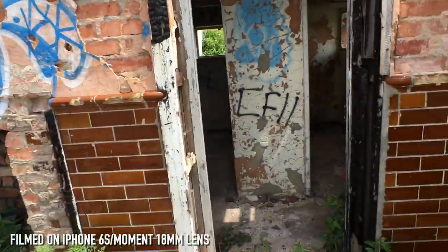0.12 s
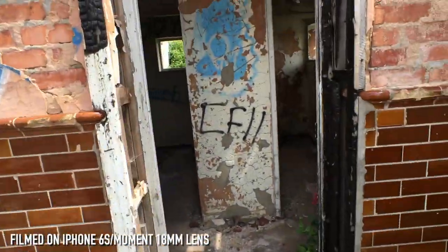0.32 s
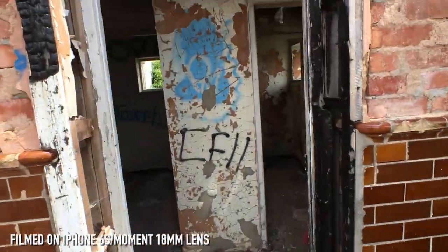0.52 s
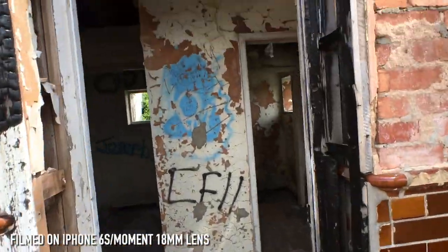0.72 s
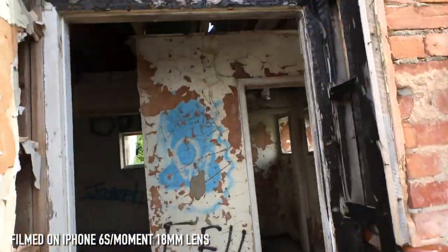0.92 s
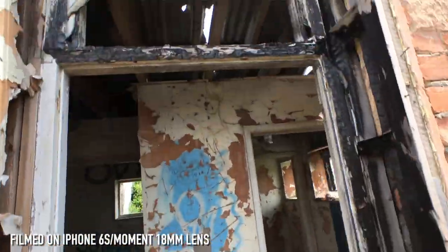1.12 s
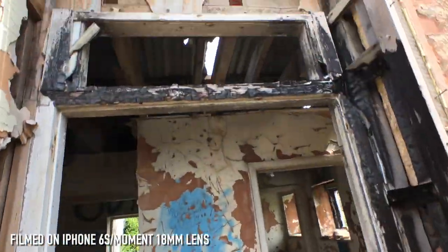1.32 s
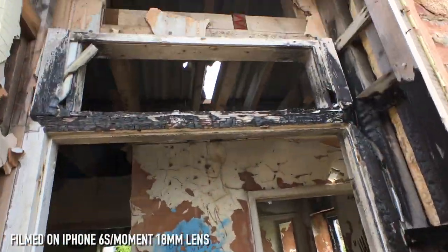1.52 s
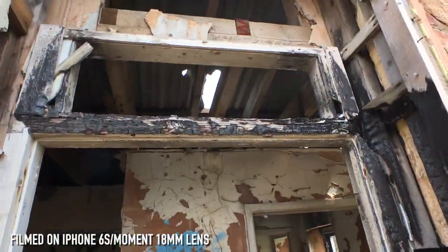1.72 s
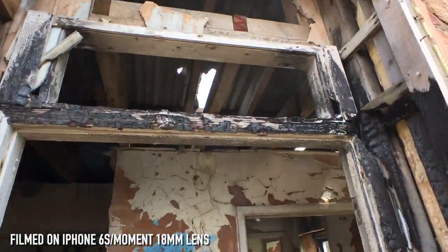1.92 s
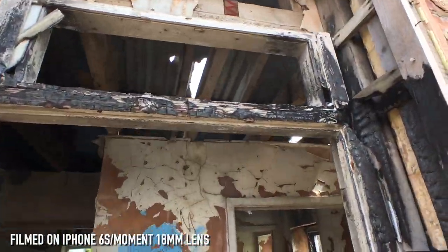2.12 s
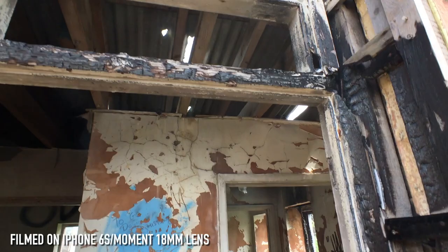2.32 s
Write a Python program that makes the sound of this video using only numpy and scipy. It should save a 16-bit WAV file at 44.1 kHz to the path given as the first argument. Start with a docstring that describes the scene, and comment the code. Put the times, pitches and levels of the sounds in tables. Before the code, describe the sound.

Slow footsteps on rubble and broken glass, a slab clacking, grit crunching, a pane clinking

```python
"""Slow steps over rubble and broken glass in the doorway of a derelict building.
A loose slab clacks under the first step, grit crunches under the second, a pane clinks, a shard scrapes:
noise-burst contacts with chip sprays plus modal ringing; the pane is one click with modes.
Splinters are short cracks with one mode each; shifting grit is a stream of pitched grains.
Near walls answer briefly; gliding sines call faintly as birds in the air, hiss and rumble of shaped noise."""
import sys
import numpy as np
from scipy import signal
from scipy.fft import rfft, irfft
from scipy.io import wavfile
from scipy.ndimage import uniform_filter1d

SR = 44100
rng = np.random.default_rng(int(sys.argv[2]) if len(sys.argv) > 2 else 0)


def waveform_to_disk(signal):
    """Save audio, clipped to [-1, 1], as 16-bit WAV at the path in sys.argv[1]."""
    frames = np.transpose(np.atleast_2d(signal))
    scaled = np.clip(frames, -1, 1) * 32767
    samples = np.round(scaled).astype(np.int16)
    wavfile.write(sys.argv[1], SR, samples)


N = 110250
SIZE = 16384  # samples in one impulse response
HZ, T = np.fft.rfftfreq(SIZE, 1 / SR), np.arange(SIZE) / SR
THUD_HZ, CLACK_HZ, MIDDLE_HZ, TREBLE_HZ = 363, 1080, 2450, 9500


def amp(db):
    """Decibels to gain."""
    return 10 ** (np.asarray(db) / 20)


def unit(x):
    """Scales to energy one."""
    return x / np.sqrt(np.sum(x ** 2) + 1e-20)


def fall(t_s, t60_s):
    """Exponential decay by 60 dB in t60_s."""
    return np.exp(-np.log(1000) * t_s / t60_s)


def read(points, hz):
    """Interpolates (frequency, dB) points on a log-frequency axis."""
    f, value = np.transpose(points)
    return np.interp(np.log(hz + 1), np.log(f), value)


def add(mix, s, sound):
    """Adds a sound at its time, cut at the end of the mix."""
    part = mix[max(round(s * SR), 0):][:len(sound)]
    part += sound[:len(part)]


def causal(db):
    """Minimum-phase impulse response with this gain curve: a sharp front."""
    log_gain = irfft(db * np.log(10) / 20)
    log_gain[1:SIZE // 2] *= 2
    log_gain[SIZE // 2 + 1:] = 0
    return irfft(np.exp(rfft(log_gain)))


def through(x, response):
    """Convolves and keeps the length."""
    return signal.fftconvolve(x, response)[:len(x)]


def noise(colour):
    """Steady Gaussian noise of rms one with the given spectrum."""
    spectrum = rfft(rng.standard_normal(N))
    gain = amp(read(colour, np.fft.rfftfreq(N, 1 / SR)))
    return unit(irfft(spectrum * gain, N)) * np.sqrt(N)


def room(x, room_db):
    """Adds echoes from floor and door frame, dense early scatter and a short tail."""
    # near walls and floor: (delay [s], gain)
    echoes = [(.0055, 0.21), (.0092, 0.66)]
    # colour of the reflections: (frequency [Hz], level [dB])
    room_colour = [(100, 0), (1000, -2.5), (5000, -0.5), (9500, -3), (16000, -2)]
    early_t60_s, late_t60_s, late_db, rise_s = 0.034, 0.14, -3.5, 0.0061
    decay = fall(T, early_t60_s) + amp(late_db) * fall(T, late_t60_s)
    scatter = unit(rng.standard_normal(SIZE) * decay * np.minimum(T / rise_s, 1))
    for delay_s, gain in echoes:
        add(scatter, delay_s * rng.uniform(.92, 1.08), np.array([gain]))
    reflected = through(x, unit(scatter))
    return x + amp(room_db) * through(reflected, causal(read(room_colour, HZ)))


def ringing(modes):
    """Dying sinusoids with soft onsets, summed to energy one."""
    out = 0
    for hz, db, t60_s in modes:
        onset = 1 - np.exp(-T * hz * 2)
        out = out + amp(db) * unit(np.cos(2 * np.pi * hz * T) * fall(T, t60_s) * onset)
    return unit(out)


def body(colour, modes, ring_db):
    """An object's answer to one click: a dry crack and its ringing modes."""
    return unit(unit(causal(read(colour, HZ))) + amp(ring_db) * ringing(modes))


def tone(thud_db, clack_db, treble_db):
    """Gain curve of one contact [dB], 0 dB in the middle."""
    points = [(THUD_HZ, thud_db), (CLACK_HZ, clack_db), (MIDDLE_HZ, 0), (TREBLE_HZ, treble_db)]
    return read(points, HZ)


def contact(decay_s, *tone_db):
    """A quickly dying cluster of tiny fractures, evened out and then given its tone."""
    rise_s, spread_db, floor_power = .0005, 3.5, 0.044
    fractures = rng.standard_normal(SIZE) * amp(spread_db * rng.standard_normal(SIZE))
    force = unit(fractures * np.exp(-T / decay_s) * (1 - np.exp(-T / rise_s)))
    power = uniform_filter1d(abs(rfft(force)) ** 2, size=90)
    own_db = 10 * np.log10(power + floor_power)
    return through(force, causal(tone(*tone_db) - own_db))


def chips(count, cycles, spread_s):
    """A spray of tiny fragments, each ringing briefly at its own pitch."""
    low_hz, high_hz = 1506, 13000
    out, t = np.zeros(SIZE), T[:1024]
    for pitch, delay, size in rng.random((count, 3)):
        hz = low_hz * (high_hz / low_hz) ** pitch
        ring = unit(np.sin(2 * np.pi * hz * t) * np.exp(-t * hz / cycles))
        add(out, -np.log(1 - delay) * spread_s, (0.067 + size) * np.sqrt(hz) * ring)
    return unit(out)


def crumble(decay_s, *tone_db):
    """A contact that also throws off chips."""
    chip_db = -2
    crack = contact(decay_s, *tone_db)
    crack_gain = np.sqrt(np.sum(crack ** 2) / 2)
    return crack + amp(chip_db) * crack_gain * chips(count=9, cycles=6, spread_s=.004)


def struck(hits, colour, modes, ring_db, room_db):
    """Each blow crumbles at the contact point and sets the whole object ringing."""
    out = np.zeros(N)
    crack = unit(causal(read(colour, HZ)))
    ring = amp(ring_db) * ringing(modes)
    for s, db, decay_s, *tone_db in hits:
        blow = causal(tone(*tone_db))
        sound = through(crumble(decay_s, *tone_db), crack) + through(blow, ring)
        add(out, s, amp(db) / np.hypot(1, amp(ring_db)) * room(sound, room_db))
    return out


def air():
    """Shaped noise: outdoor background, a hiss that comes and goes, a low rumble with one swell."""
    # background, hiss and rumble spectra: (frequency [Hz], level [dB])
    air_colour = [(15, -32.5), (28, -18.5), (46, -4), (87, -11), (200, -15), (350, -14), (440, -26.5),
                  (700, -23), (1370, -30.5), (2000, -26), (2700, -40), (4030, -35.5), (16000, -65.5)]
    hiss_colour = [(100, -11), (400, 0.5), (1200, 2.5), (2500, -3.5), (6200, -4.5), (7500, -15),
                   (10000, -11.5), (16000, -20.5)]
    rumble_colour = [(20, -24.5), (36, -6.5), (46, 0.5), (65, -8.5), (130, -20.5), (400, -50.5),
                     (2000, -79)]
    # hiss and rumble courses: (time [s], level [dB])
    hiss_level = [(0, -66), (.22, -68.5), (.55, -63), (.85, -67), (1.3, -63.5), (1.55, -72.5),
                  (1.95, -73.5), (2.2, -68.5), (2.5, -61)]
    rumble_level = [(0, -78), (1.74, -73), (1.78, -51), (1.83, -62), (1.93, -65), (2.02, -68), (2.5, -69)]
    air_db = -65.5
    t = np.arange(N) / SR
    hiss = noise(hiss_colour) * amp(np.interp(t, *np.transpose(hiss_level)))
    rumble = noise(rumble_colour) * amp(np.interp(t, *np.transpose(rumble_level)))
    return amp(air_db) * noise(air_colour) + hiss + rumble


def birds():
    """Thin falling whistles: wavering sine glides, blurred by reflections."""
    # distant calls: (start [s], length [s], first pitch [Hz], last pitch [Hz], level [dB])
    calls = [(0.627, 0.076, 1685, 1620, -67.5), (.775, 0.031, 2330, 2200, -64.5),
             (0.804, .035, 2090, 1780, -65), (1.0, 0.026, 2150, 1800, -61.5),
             (1.238, 0.029, 2190, 1960, -65.5), (1.481, 0.088, 2123, 2086, -68),
             (1.775, 0.0382, 2125, 1830, -68), (2.01, 0.029, 2200, 1750, -64),
             (2.26, 0.037, 2300, 2120, -62)]
    waver_depth, room_db = 0.0286, 3
    out = np.zeros(N)
    for start_s, length_s, first_hz, last_hz, db in calls:
        u = np.arange(0, length_s, 1 / SR) / length_s
        waver = np.interp(u, np.linspace(0, 1, 12), rng.standard_normal(12))
        hz = (first_hz + (last_hz - first_hz) * u ** 2) * (1 + waver_depth * waver)
        whistle = np.sqrt(2) * np.sin(2 * np.pi * np.cumsum(hz) / SR)
        add(out, start_s, amp(db) * np.sin(np.pi * u) * whistle)
    return room(out, room_db)


def grit():
    """Pitched grains of uneven size crackle while the weight shifts."""
    # grit shifting under the shoes: (start [s], length [s], level [dB])
    spells = [(0, 0.18, -72), (0.247, 0.21, -48.5), (.45, .4, -68.5), (1.031, 0.17, -53),
              (1.179, 0.1, -61.5), (1.345, 0.063, -52), (1.757, 0.072, -69), (2.22, 0.17, -66)]
    # grit spectrum: (frequency [Hz], level [dB])
    colour = [(100, -18), (700, -2.5), (2000, -3.5), (4500, 1), (6200, -1), (7500, -12.5), (9500, -3),
              (16000, -22.5)]
    grains_per_s, spread_db, room_db = 870, 6.5, -2
    clicks, t = np.zeros(N), np.arange(N) / SR
    for start_s, length_s, db in spells:
        chance, size = rng.random(N), rng.standard_normal(N)
        size_gain = amp(spread_db * np.minimum(size ** 2, 4))
        grains = (chance < grains_per_s / SR) * np.sign(size) * size_gain
        swell = np.sqrt(np.maximum(np.sin(np.pi * t / length_s), 0)) * (t < length_s)
        add(clicks, start_s, amp(db) * unit(grains * swell) * np.sqrt(length_s * SR))
    kind = rng.integers(0, 32, N)  # one of 32 random pitches per grain
    out = np.zeros(N)
    for k in np.unique(kind):
        out += through(clicks * (kind == k), chips(count=1, cycles=1.2, spread_s=0))
    return room(through(out, causal(read(colour, HZ))), room_db)


def splinters():
    """Each splinter breaks with one sharp crack and a brief ring of its own."""
    # snaps: (time [s], level [dB], clack [dB], treble [dB], ring pitch [Hz], ring t60 [s],
    # ring level [dB], room level [dB])
    snaps = [(.034, -42, -3, 2.5, 5250, .01, -24, 3), (0.1201, -35.5, 17.5, 0, 3135, 0.043, 8.5, 0),
             (0.258, -26.5, 18, -0.5, 10750, .015, -7, 12.5), (0.3118, -26, 7, 0, 9730, 0.041, 6.5, -6),
             (0.543, -27, 6, -12, 1230, 0.0048, -2, -3), (.604, -32.5, 17, -4, 5250, .01, 0, 1),
             (0.6279, -21, 12.5, 0, 4870, 0.0044, -11.5, -1),
             (0.7071, -44.5, -15, 13, 8670, 0.0037, -2, -6), (.7315, -52.5, 0, 16, 8800, .01, -20, 4),
             (0.8735, -28, 0, -5, 9500, 0.0055, 6.5, -4), (.8869, -10, 2.5, 3, 9100, 0.0041, 2, -2),
             (0.9673, -28, -8, 3, 11000, .003, -3, -1.5), (1.2095, -33.5, -5, 2.5, 3980, .01, -12, -0.5),
             (1.233, -31, -6, 0.5, 3340, 0.0088, -6, -3), (1.391, -38, -2.5, 2, 9460, 0.012, -6, 8),
             (1.781, -48, -3, 6, 11500, .004, -2.5, 3), (1.803, -51.5, -6, -4, 12500, .004, -6, 5),
             (2.195, -42.5, -3, -1, 5140, .01, 2, 2), (2.08, -38, 7, -8, 3815, .05, 17.5, -3),
             (2.105, -30, 0, 1, 4270, 0.034, 9.5, 3), (2.2432, -35, -19, -2, 9000, 0.0062, 0, 7),
             (2.2505, -36.5, -6, -2, 4840, 0.0048, 10, -3), (2.2565, -34, -10, -7, 8850, 0.0089, -1, -9),
             (2.290, -36.5, -8, -12, 3620, .01, 5, -12), (2.3716, -27, -16, -6.5, 5470, 0.0072, 0, 1),
             (2.434, -28, -20, 3.5, 5870, 0.0095, 1, 0.5)]
    # crack spectrum: (frequency [Hz], level [dB])
    colour = [(100, -25.5), (600, -11), (2000, -6.5), (3800, 1), (5700, -2), (7000, -14.5), (9500, -3.5),
              (13000, -5.5), (16000, -19)]
    out = np.zeros(N)
    for s, db, clack_db, treble_db, hz, t60_s, ring_db, room_db in snaps:
        splinter = body(colour, [(hz, 0, t60_s)], ring_db)
        crack = through(contact(0.00055, 0, clack_db, treble_db), splinter)
        add(out, s, amp(db) * np.hypot(1, amp(ring_db)) * room(crack, room_db))
    return out


def shard():
    """A glass shard scrapes and taps: small contacts excite its high modes."""
    # taps: (time [s], level [dB], decay time [s], thud [dB], clack [dB], treble [dB])
    hits = [(2.000, -27.5, 0.012, -5, -18, -1), (2.0095, -18.5, .0015, -6, -8, -1.5),
            (2.016, -21.5, 0.00082, -16, -23, 6.5), (2.029, -22, 0.02, -4, 8, -2.5),
            (2.054, -29.5, 0.0058, -17, 8, 8), (2.061, -23.5, 0.01, -11, -3, 2),
            (2.074, -29, .01, -8, -22, -1), (2.0905, -15.5, 0.008, 14.5, 13, -2.5),
            (2.1055, -24.5, .002, -11, 9, 2), (2.111, -24, 0.0036, 6, 16.5, 2.5),
            (2.137, -31, 0.0039, 0, 14, -4)]
    # crack spectrum: (frequency [Hz], level [dB])
    colour = [(100, -50), (600, -9), (1100, -9), (2200, -16), (3100, -1), (3600, -7.5), (4200, 0.5),
              (4900, -7.5), (5600, 2), (6700, -18.5), (8000, -9.5), (9600, 2), (11500, -15), (12700, -14),
              (15500, -10.5)]
    # modes: (frequency [Hz], level [dB], t60 [s])
    modes = [(620, -20, .08), (3025, -7, .08), (3160, -5, .08), (3815, -9, .06), (4190, -2, .08),
             (4330, -5, .15), (5305, -7, .07), (5525, -3, .07), (8800, -12, .05), (9720, -8, .04),
             (11450, -12, .06)]
    return struck(hits, colour, modes, ring_db=-0.5, room_db=-2)


def pane():
    """A larger piece of glass gives one hard click and rings on."""
    # click spectrum: (frequency [Hz], level [dB])
    colour = [(100, -22), (350, -11), (560, 1.5), (850, -7), (1400, 1), (2000, -9.5), (2600, -4),
              (4200, 3.5), (6000, -4.5), (7800, -9), (9700, -6), (16000, -24)]
    # modes: (frequency [Hz], level [dB], t60 [s])
    modes = [(570, -14, .1), (3031, -10, .21), (3600, -3, .22), (3690, -4, .22), (3898, -8, .13),
             (4425, -11, .12), (5313, -9, .15), (5518, -7, .16), (7300, -19, .12), (9690, -18, .06)]
    click_s, click_db, sustain_db = 1.3413, -17, -19
    out = np.zeros(N)
    click = room(body(colour, modes, ring_db=-8), room_db=8)
    add(out, click_s, amp(click_db) * click + amp(sustain_db) * ringing(modes))
    return out


def crunch():
    """Grit crushed under the sole: crumbling contacts with a short modal ring."""
    # crushes: (time [s], level [dB], decay time [s], thud [dB], clack [dB], treble [dB])
    hits = [(1.0275, -21.5, 0.0043, -6, 6.5, 2), (1.036, -18.5, 0.0056, 9, -3, -12),
            (1.042, -16, 0.0055, 12, 8, 2), (1.051, -37, 0.0029, 4, 6, -2), (1.059, -13, 0.0015, -2, 7, 1),
            (1.069, -30, .003, 5, 6, 0), (1.0728, -0.5, 0.0023, -2, -9.5, -6.5),
            (1.080, -16, 0.0014, -3, 3, 2), (1.084, -16, 0.0027, 4.5, 9.5, -13),
            (1.104, -25.5, 0.0086, 10, 6, 6), (1.1335, -21, 0.004, -5, 5, 2),
            (1.146, -24.5, 0.0065, -6, 10.5, 1.5), (1.157, -19, 0.0029, -4, -4, -5),
            (1.164, -13, 0.003, -12, -15, -9), (1.171, -23, 0.0011, -5, -2, -12),
            (1.2725, -30.5, 0.0043, 1, -21, 3), (1.286, -18, 0.0044, -21, -14, -5.5),
            (2.312, -26.5, 0.0057, -16, -21, -2.5), (2.318, -29, 0.0022, -3, 3, 2.5),
            (2.336, -38.5, 0.013, 2, 20.5, 2), (2.388, -28, 0.0029, -9, 5, 2),
            (2.3935, -25.5, 0.0059, 5, -3, -6), (2.467, -32.5, 0.0035, 0, 17.5, 2)]
    # crack spectrum: (frequency [Hz], level [dB])
    colour = [(60, -26.5), (200, -8.5), (600, -2), (1700, -7.5), (2500, 1), (3600, -3), (6000, -1.5),
              (8000, -11.5), (11000, -7.5), (16000, -24)]
    # modes: (frequency [Hz], level [dB], t60 [s])
    modes = [(391, -1, 0.046), (2410, 16, 0.097), (2504, -6, .06), (2593, -5, 0.045), (3030, -17.5, 0.13),
             (4185, 2.5, 0.2), (5470, 8.5, 0.1)]
    return struck(hits, colour, modes, ring_db=-12.5, room_db=-2.5)


def slab():
    """A loose slab rocks and knocks: crumbling contacts set its modes ringing."""
    # knocks: (time [s], level [dB], decay time [s], thud [dB], clack [dB], treble [dB])
    hits = [(.2425, -19.5, .002, -6, -2, 2), (.2452, -9, 0.0013, -8.5, 8, 0.5),
            (.2485, -6, 0.0015, 9, 4, -1), (.2665, -22.5, 0.0015, 26, 7.5, -5.5),
            (.303, -19.5, .004, 3, 2.5, 5.5), (.313, -24, 0.0035, 22, 14.5, 8),
            (.331, -16.5, .004, 15.5, -3.5, 3.5), (.336, -10, 0.0035, 14.5, -4.5, 3.5),
            (.3535, -10, 0.0024, -6, -13.5, 6.5), (.3595, -1, 0.0063, -9.5, 1, -8),
            (.3622, 5, 0.0034, -17, 2.5, -3.5), (.3665, -10.5, 0.0036, -5, 2.5, -5),
            (.3995, -6, 0.014, 6, -9, -1.5), (.409, -14, 0.0072, -8, 7.5, -15.5),
            (.421, -2.5, 0.0026, -14, -1, -10.5)]
    # crack spectrum: (frequency [Hz], level [dB])
    colour = [(50, -53), (110, -31), (200, -19), (600, -6.5), (950, 4), (1750, -13), (2450, 0),
              (3000, -8.5), (5300, -8.5), (7800, -23), (10000, -20.5), (12500, -26.5), (16000, -38)]
    # modes: (frequency [Hz], level [dB], t60 [s])
    modes = [(355, -17, .13), (691, -14, .14), (890, 0, .13), (945, -7, .06), (1226, -3, .13),
             (1482, -8, .15), (2044, -10, .11), (2180, -5, .13), (2269, -5, .13), (2490, -5, .06),
             (2638, -2, .1), (5294, -11, .1), (5412, -13, .1), (6750, -18, .09)]
    return struck(hits, colour, modes, ring_db=-7, room_db=-5)


def inner_rooms(debris):
    """Faint long echo of the debris: convolution with decaying noise."""
    t60_s, echo_db = 1.2, -31
    tail = unit(rng.standard_normal(N) * fall(np.arange(N) / SR, t60_s))
    return amp(echo_db) * through(debris, tail)


def scene():
    """Debris underfoot, its faint echo from the inner rooms, and the air outside."""
    debris = slab() + crunch() + shard() + pane() + splinters() + grit()
    return (debris + inner_rooms(debris) + birds() + air())[None]


def record(dry):
    """Linear-phase low-pass band limit."""
    cutoff_hz = 16000
    lowpass = signal.firwin(301, cutoff_hz, window=("kaiser", 8), fs=SR)
    return signal.oaconvolve(dry, lowpass[None], "same")


dry = scene()
out = record(dry)
waveform_to_disk(out)
```